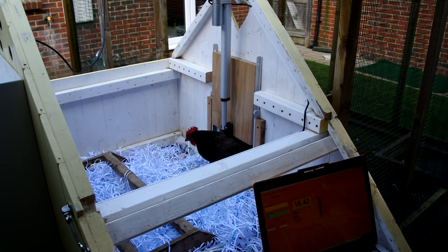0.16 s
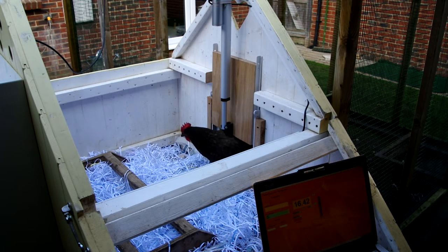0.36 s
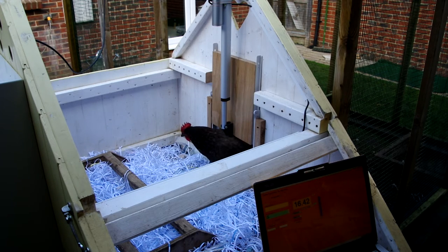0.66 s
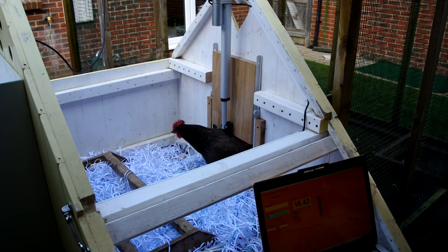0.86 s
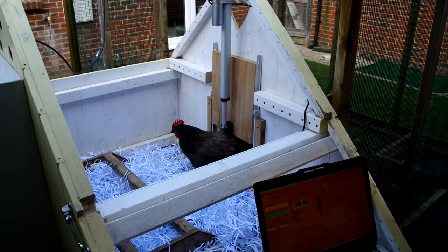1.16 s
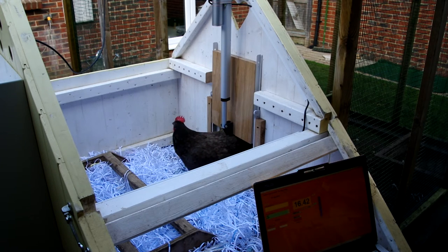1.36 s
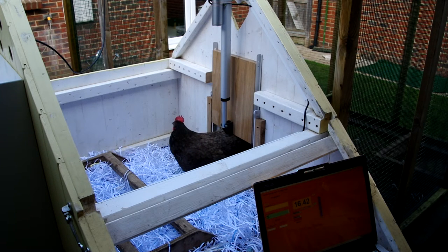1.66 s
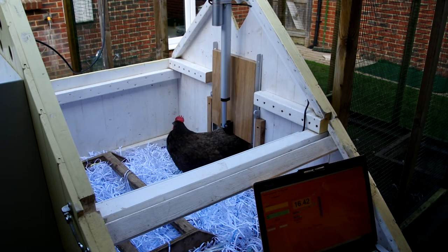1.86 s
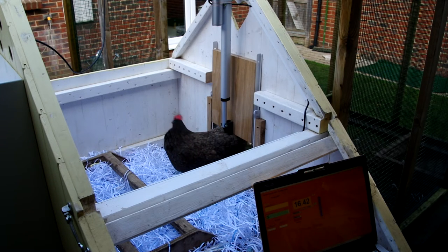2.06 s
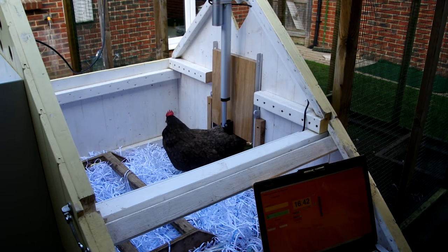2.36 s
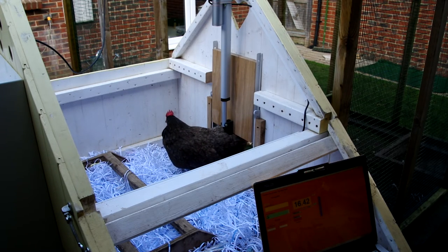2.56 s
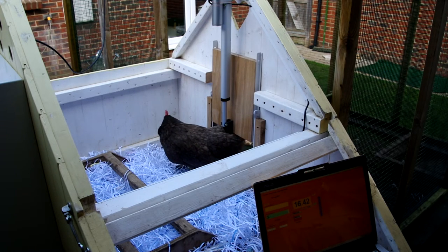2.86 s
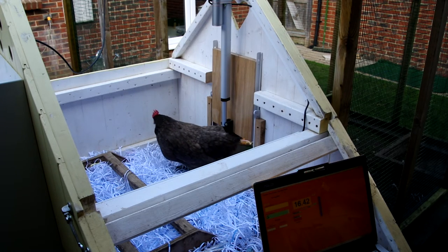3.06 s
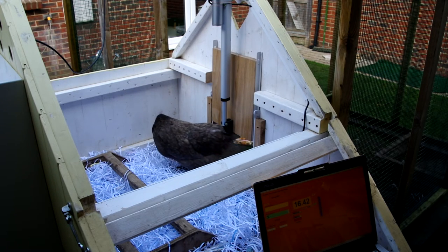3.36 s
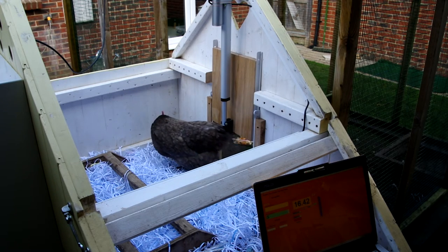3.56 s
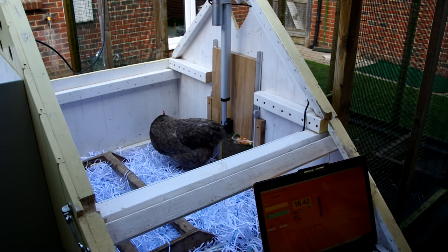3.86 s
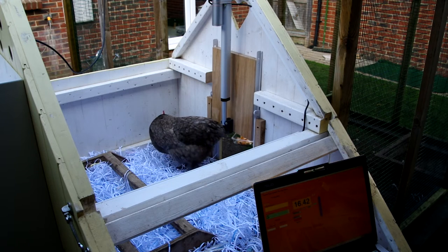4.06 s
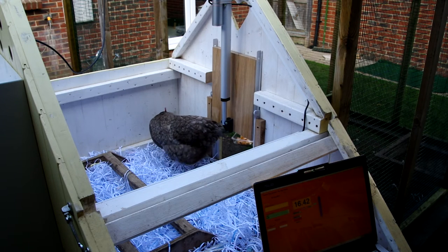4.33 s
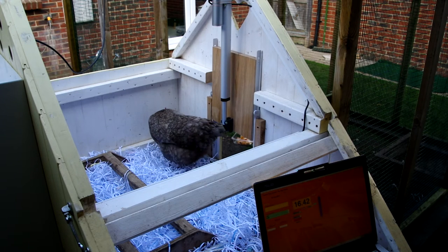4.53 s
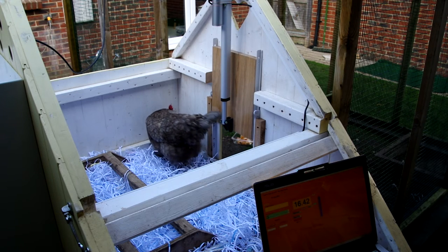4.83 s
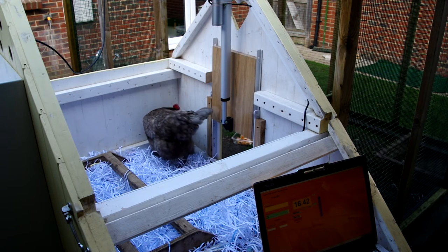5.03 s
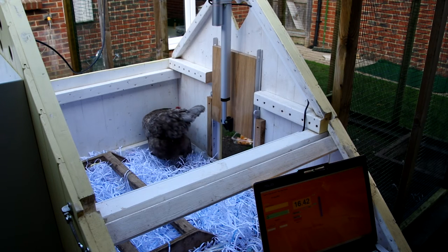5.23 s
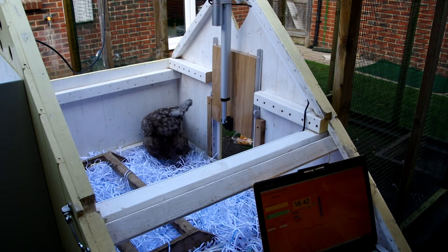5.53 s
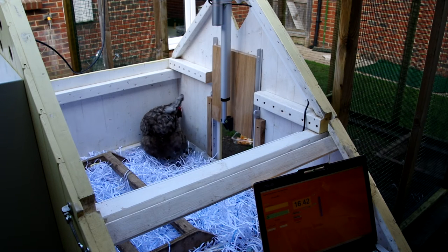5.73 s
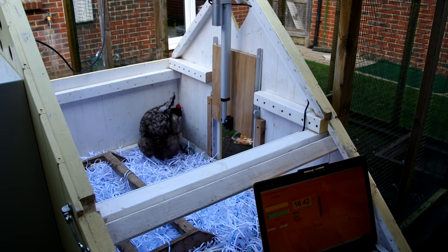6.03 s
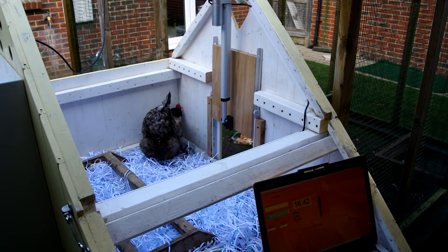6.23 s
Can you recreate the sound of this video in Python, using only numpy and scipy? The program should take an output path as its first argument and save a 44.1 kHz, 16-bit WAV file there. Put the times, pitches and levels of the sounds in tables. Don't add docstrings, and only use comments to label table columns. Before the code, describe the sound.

From 0 s an electric actuator is already in full motion, lifting a wooden coop door, and it runs unbroken to the end at about 6.4 s. Its high whine, strongest near 2.7 kHz, sits inside a bright, gritty gear rattle that pulses about two and a half times a second. Pitch stays almost constant, easing down very slightly after 3 s; around 2.7 s the tone shifts subtly as the load is taken. The door rubs with a low woody scrape, briefly slipping, and catches in short dull knocks near 0.4, 1.3-1.5, 2.1, 2.8-3.0, 3.5, 4.5 and 4.8 s, a cluster at 5.3-5.4 s, then 6.1 and 6.3 s. Faint distant engines and outdoor air hum below, one engine running down after 5.75 s. A tiny high bird peep sounds near 5.2 s. Close, dry, mono outdoor microphone.

```python
import sys
import numpy as np
from scipy import signal
from scipy.fft import rfft, irfft, next_fast_len
from scipy.io import wavfile
from scipy.ndimage import uniform_filter1d

SR = 44100
rng = np.random.default_rng(int(sys.argv[2]) if len(sys.argv) > 2 else 0)


def generate_wav(signal):
    frames = np.transpose(np.atleast_2d(signal))
    scaled = np.clip(frames, -1, 1) * 32767
    pcm = np.round(scaled).astype(np.int16)
    wavfile.write(sys.argv[1], SR, pcm)


def boost(x):
    u = np.asarray(x, float) / 20
    return 10 ** u


N = 281798

# level in dB, change over the stroke in dB, change at take-up in dB.
PARTS = [
    (-52.5, -3.5, 1.2),
    (-60.5, -10, -2.5),
    (-44, -1.5, 2),
    (-53.5, 0.5, -0.5),
    (-50.7, -2.5, 1),
    (-43.5, -0.3, -0.3),
    (-42.5, 1, -2),
    (-42.5, -0.2, 1),
    (-36.5, -0.3, -0.2),
    (-35, -1, 0),
]
# frequency in Hz, level in dB per Hz.
BOARDS = [(100, -52), (230, -18.5), (290, -8), (350, -0.5), (420, -5), (620, -5), (750, -1), (820, -5),
          (920, -10.5), (990, -17), (1300, -26), (2000, -25)]


def rattle(angle, parts_db, fresh_db=-7, fresh_top_db=-3, low_share=0.05):
    # beats a cycle, middle depth in dB, middle lag in turns,
    # top depth in dB, top lag in turns.
    load = [(1, 0.21, 0.22, 0.29, 0.33), (2, 1.98, 0.4, 3.53, 0.29), (3, 0.13, 0.29, 0.37, 0.14),
            (4, 0.45, 0.32, 1.03, 0.22), (5, 1.3, 0.68, 1.31, 0.73), (6, 1.25, 0.24, 1.65, 0.35),
            (7, 0.48, 0.27, 0.21, 0.58), (8, 0.11, 0.81, 0.71, 0.01), (10, 0.33, 0.26, 0.87, 0.45),
            (12, 0.41, 0.71, 0.14, 0.96), (15, 0.19, 0.1, 0.06, 0.77), (20, 0.35, 0.26, 0.43, 0.19),
            (25, 0.16, 0.9, 0.45, 0.74), (30, 0.23, 0.25, 0.48, 0.16)]
    flank_db, gap_db, sleeve_db = -50, -54.5, -49.5
    case_db, tube_db, collar_db, nut_db, shell_db, top_db = parts_db[4:]

    middle_load_db, top_load_db = np.zeros(N), np.zeros(N)
    for beats, middle_depth_db, middle_lag, top_depth_db, top_lag in load:
        middle_load_db += middle_depth_db * np.cos(2 * np.pi * (beats * angle - middle_lag))
        top_load_db += top_depth_db * np.cos(2 * np.pi * (beats * angle - top_lag))

    faces, fresh = tooth_faces(angle), rng.standard_normal(N)
    contact = faces + boost(fresh_db) * fresh
    low = contact * boost(low_share * middle_load_db)
    middle = contact * boost(middle_load_db)
    top = (faces + boost(fresh_top_db) * fresh) * boost(top_load_db)

    grid_hz = np.arange(0, SR / 2, 5.)
    housing_gain = housing(grid_hz)

    def below(hz, edge_hz):
        return 1 / np.sqrt(1 + (hz / edge_hz) ** 40)

    def region(x, low_hz, high_hz):
        gain = housing_gain * below(grid_hz, high_hz) * below(low_hz, grid_hz + 1)
        return coloured(x, lambda hz: np.interp(hz, grid_hz, gain))

    return (boost(flank_db) * region(low, 860, 3090)
            + boost(case_db) * region(low, 2990, 3680)
            + boost(gap_db) * region(low, 3780, 4010)
            + boost(tube_db) * region(low, 4190, 4900)
            + boost(sleeve_db) * region(low, 5090, 5640)
            + boost(collar_db) * region(middle, 5740, 6890)
            + boost(nut_db) * region(middle, 7060, 7960)
            + boost(shell_db) * region(middle, 8280, 10460)
            + boost(top_db) * region(top, 11010, 16800))


def tooth_faces(angle, wear_turns=0.42):
    # repeats in six cycles, level in dB.
    repeats = [(30, -14), (12, -13), (6, -10), (2, -8), (1, -2)]
    size, top = 2 ** 17, 6600
    k = np.arange(top)
    power = sum(boost(2 * db) * n * (k % n == 0) for n, db in repeats)
    z = np.sqrt(power) * (rng.standard_normal((2, top)) + 1j * rng.standard_normal((2, top)))
    position = angle / 6 % 1 * size
    old, new = (np.interp(position, np.arange(size), evened(w)) for w in irfft(z, size))
    wear = 2 * np.pi * wear_turns * np.arange(N) / N
    return old * np.cos(wear) + new * np.sin(wear)


def housing(hz):
    # frequency in Hz, width in Hz, level in dB.
    rings = [(1771, 450, -29.8), (2202, 536, -32.0), (2737, 206, -24.4), (3221, 106, -30.5),
             (3581, 194, -18.1), (4139, 357, -27.6), (4615, 362, -16.1), (5050, 164, -24.3),
             (5301, 205, -22.3), (5602, 212, -19.8), (6311, 191, -16.9), (6785, 299, -19.8),
             (7295, 641, -17.1), (7910, 266, -16.6), (8197, 127, -17.3), (8464, 334, -18.9),
             (9121, 596, -14.2), (9392, 429, -16.8), (10130, 841, -25.5), (10894, 367, -26.3),
             (11150, 275, -24.4), (11843, 563, -19.4), (12473, 318, -18.7), (12832, 260, -18.0),
             (13328, 1500, -20.7), (14258, 825, -16.7), (15176, 342, -26.0), (15539, 230, -24.1)]
    # frequency in Hz, level in dB.
    base = [(950, -33), (1350, -39), (1900, -50), (2550, -43), (3080, -50), (3860, -42), (4400, -38),
            (5500, -29), (7800, -30), (11000, -48), (15700, -48)]
    power = sum(boost(2 * db) / (1 + (2 * (hz - f) / width) ** 2) ** 2 for f, width, db in rings)
    return np.sqrt(power + boost(2 * read(base, hz))) / (1 + (1000 / (hz + 1)) ** 12)


def whine(angle, parts_db, waver_db=0.1):
    # beats a cycle, level in dB rms.
    tones = [(25, -54), (44, -61), (58, -59), (60, -52), (110, -63), (115, -57), (118, -62), (120, -60),
             (130, -59), (132, -64), (145, -61), (178, -56.5), (180, -44), (182, -66), (185, -66),
             (186, -65), (235, -56), (238, -58), (240, -54), (242, -58), (290, -62), (294, -61), (295, -55),
             (298, -58), (300, -52), (302, -56), (303, -53), (305, -56), (307, -55), (314, -63)]
    tight = .73
    panel_db = -51.5 - 3.5 * np.arange(N) / N + 8.3 * grip() - drift(6.)
    led = dict(zip((60, 120, 180, 240, 25), parts_db[:4] + [panel_db]))
    swell_db = 1.4 * (parts_db[5] - PARTS[5][0])
    strand_beats, strand_swell, strand_rise_db = 307, 2.6, 5
    start, out = rng.random(8), np.zeros(N)
    for beats, db in tones:
        if beats in led:
            level_db = led[beats]
        else:
            level_db = db + waver_db * drift(3.) + swell_db * (beats > 280)
        if beats == strand_beats:
            level_db = level_db + (strand_swell - 1) * swell_db + strand_rise_db * np.arange(N) / N
        turns = beats * (angle - tight) + start[int(beats + 30) // 60] + .06 * drift(1.5)
        out += np.sqrt(2) * boost(level_db) * np.cos(2 * np.pi * turns)
    return out


def cycles():
    # time in seconds, lead in beats.
    lead = [(0.0, -0.18), (0.2, -0.26), (0.45, 0.38), (1.2, 1.34), (1.45, 1.44), (2.2, 2.26), (2.75, 3.34),
            (3.35, 2.47), (4.0, 0.6), (4.55, -0.64), (5.1, -2.18), (5.7, -3.97), (6.39, -5.14)]
    mesh3_hz, beats_per_cycle = 2707, 180
    lead_beats = uniform_filter1d(curves(lead)[0], 3000, mode="nearest") + sway(.1, .11)
    return (mesh3_hz * np.arange(N) / SR + lead_beats) / beats_per_cycle


def levels():
    # once a turn in dB, lag in turns, twice a turn in dB, lag in turns.
    sway_in = [(0.5, 0.88, 0.4, 0.25), (1, 0.97, 1, 0.91), (-0.1, 0.39, 0.6, 0.39), (4, 0.78, 0.2, 0.17),
               (3.8, 0.85, 1, 0.25), (1.51, 0.48, 1.24, 0.96), (1.5, 0.25, 1.6, 0.71),
               (0.8, 0.91, -0.2, 0.84), (0.1, 0.01, 0.64, 0.79), (0.3, 0.1, 0.8, 0.62)]
    # once a turn in dB, lag in turns, twice a turn in dB, lag in turns.
    sway_out = [(0.8, 0.96, 0.8, 0.22), (-0.5, 0.23, 6.5, 0.52), (0.6, 0.87, 0.69, 0.13),
                (4, 0.23, -0.3, 1), (1.41, 0.12, 1.2, 1), (1.42, 0.6, 1.9, 0.41), (-0.6, 0.14, -0.3, 0.49),
                (2.8, 0.93, 1.9, 0.98), (-0.1, 0.02, 0.7, 0.27), (0.7, 0.11, 0.39, 0.2)]
    take_up_s, take_up_length_s = 2.65, .1
    depths = [2.3] * 4 + [1] * 6
    rod_out = np.arange(N) / N
    taken = np.clip((np.arange(N) / SR - take_up_s) / take_up_length_s, 0, 1)
    parts_db = []
    for (db, stroke_db, step_db), a, b, depth in zip(PARTS, sway_in, sway_out, depths):
        swing_db = depth * ((1 - rod_out) * sway(*a) + rod_out * sway(*b))
        parts_db.append(db + stroke_db * (rod_out - .5) + step_db * (taken - .5) + swing_db)
    return parts_db


def sway(once, once_lag, twice=0, twice_lag=0):
    screw_hz = 2.45
    t = np.arange(0, N + 256, 256)
    turns = screw_hz * t / SR
    swing = once * np.cos(2 * np.pi * (turns - once_lag)) + twice * np.cos(2 * np.pi * (2 * turns - twice_lag))
    return np.interp(np.arange(N), t, swing)


def door(grab_db=2.0, knocks_per_s=90, knock_db=-11):
    rub_db = -44.5
    rub = rng.standard_normal(N) * boost(grab_db * evened(uniform_filter1d(rng.standard_normal(N), 500)))
    knocks = evened(rng.standard_normal(N) * (rng.random(N) < knocks_per_s / SR))
    return boost(rub_db + grip()) * coloured(rub + boost(knock_db) * knocks, lambda hz: boost(read(BOARDS, hz)))


def grip():
    # time in seconds, half length in seconds, grip in dB.
    slips = [(.55, .08, -0.5), (1.42, 0.061, -0.5), (1.79, 0.12, -2.5), (2.11, 0.033, -2.5),
             (3.07, .06, -0.5), (4.142, 0.042, -3.5), (5.11, 0.17, -1), (5.7, .17, -0.5),
             (6.254, .05, -2.5)]
    t = np.arange(N) / SR
    return sway(0.16, 1) + sum(db * np.exp(-((t - s) / half_s) ** 4) for s, half_s, db in slips)


def catches(ring_s=0.01, trim_db=-4.5):
    # time in seconds, peak level in dB.
    blows = [(0.306, -42), (0.422, -32), (1.132, -39), (1.337, -29), (1.456, -30), (2.063, -30.5),
             (2.329, -35), (2.789, -33), (2.986, -33), (3.542, -31), (3.819, -35), (4.041, -34),
             (4.529, -32), (4.773, -30), (5.301, -31), (5.359, -32), (5.389, -29), (6.099, -34),
             (6.129, -31), (6.318, -30)]
    attack_s = 0.0027
    size = next_fast_len(4096)
    t, out = np.arange(size) / SR, np.zeros(N + size)
    board_gain = boost(read(BOARDS, np.fft.rfftfreq(size, 1 / SR)))
    for (s, db), noise in zip(blows, rng.standard_normal((len(blows), size))):
        blow = evened(irfft(rfft(noise) * board_gain, size))
        envelope = np.exp(-t / ring_s) * np.minimum(t / attack_s, 1)
        out[round(s * SR):][:size] += boost(db + trim_db) * blow * envelope
    return out[:N]


def bird():
    # time in seconds, frequency in Hz, level in dB rms.
    peep = [
        (5.155, 5800, -75),
        (5.165, 5850, -47),
        (5.19, 5870, -47),
        (5.2, 5800, -75),
    ]
    hz, db = curves(peep)
    return np.sqrt(2) * boost(db) * np.sin(2 * np.pi * np.cumsum(hz) / SR) * (db > -74)


def yard(waver_db=1.3):
    # frequency in Hz, drift in Hz a second, level in dB rms, fade in dB a second.
    hums = [
        (45, -0.244, -61, -0.1),
        (60, 0.0067, -61, -0.85),
        (79, 0.133, -60, -0.27),
        (221.6, -0.258, -68.5, -0.4),
        (117.3, 0.417, -68.5, -0.9),
    ]
    # frequency in Hz, level in dB per Hz.
    air_spectrum = [(8, -25), (20, -9), (29, 5), (40, 1), (90, 0), (150, 1.5), (250, -1.5), (500, -13),
                    (2000, -39)]
    air_db = -62.5
    throb_depth_db, throb_s, throb_top_s = 3, 3.1, 1.73
    shut_s, shut_hz_per_s, shut_db_per_s = 5.75, -30, -12
    out = boost(air_db) * coloured(rng.standard_normal(N), lambda hz: boost(read(air_spectrum, hz)))
    t = np.arange(N) / SR
    throb_db = throb_depth_db * np.cos(2 * np.pi * (t - throb_top_s) / throb_s)
    since_shut_s = np.maximum(t - shut_s, 0)
    for k, (hz, hz_per_s, db, db_per_s) in enumerate(hums):
        pitch_hz = hz + hz_per_s * t + (k == 2) * shut_hz_per_s * since_shut_s
        level_db = db + db_per_s * t + (k == 0) * throb_db + (k == 2) * shut_db_per_s * since_shut_s
        hum = np.sin(2 * np.pi * np.cumsum(pitch_hz) / SR)
        out = out + np.sqrt(2) * boost(level_db + waver_db * drift(3.8)) * hum
    return out


def evened(x):
    return x / np.sqrt(np.mean(x ** 2) + 1e-20)


def curves(rows):
    s, *columns = np.transpose(rows)
    return [np.interp(np.arange(N) / SR, s, c) for c in columns]


def read(points, hz):
    f, value = np.transpose(points)
    return np.interp(np.log(hz + 1), np.log(f + 1), value)


def coloured(x, gain):
    size = next_fast_len(N)
    return evened(irfft(rfft(x, size) * gain(np.fft.rfftfreq(size, 1 / SR)), size)[:N])


def drift(hz):
    f, start = np.geomspace(hz / 8, hz, 12)[:, None], rng.random((12, 1))
    t = np.arange(0, N, 256)
    return np.interp(np.arange(N), t, evened(np.sin(2 * np.pi * (f * t / SR + start)).sum(0)))


def scene():
    angle, parts_db = cycles(), levels()
    actuator = rattle(angle, parts_db) + whine(angle, parts_db)
    return (actuator + door() + catches() + bird() + yard())[None]


def top_cut(x):
    return signal.sosfilt(signal.butter(12, 16090, fs=SR, output="sos"), x)


def record(dry):
    edge_hz = 15725
    size = next_fast_len(N)
    passed = np.fft.rfftfreq(size, 1 / SR) < edge_hz
    limited = irfft(rfft(dry, size) * passed, size)[:, :N]
    return top_cut(limited)


dry = scene()
out = record(dry)
generate_wav(out)
```